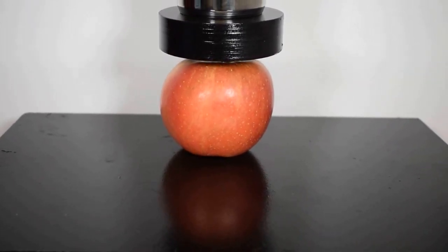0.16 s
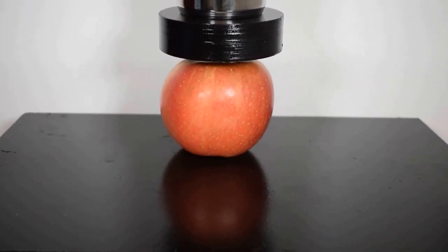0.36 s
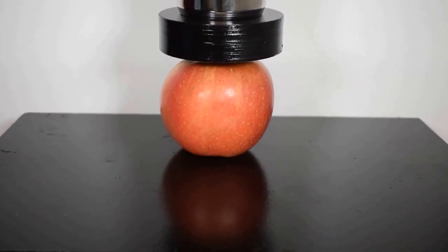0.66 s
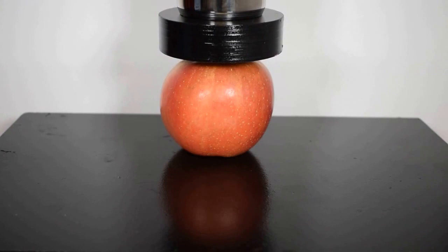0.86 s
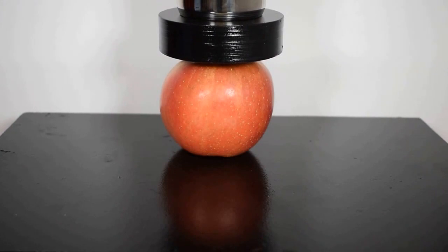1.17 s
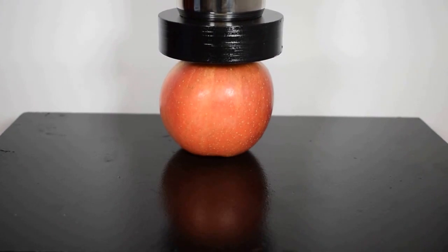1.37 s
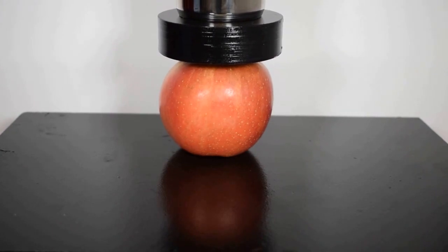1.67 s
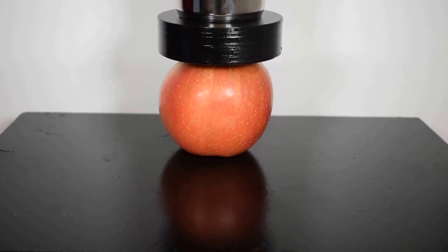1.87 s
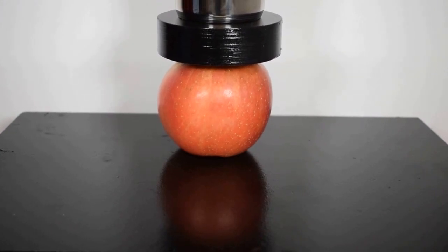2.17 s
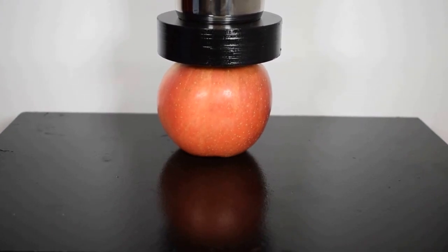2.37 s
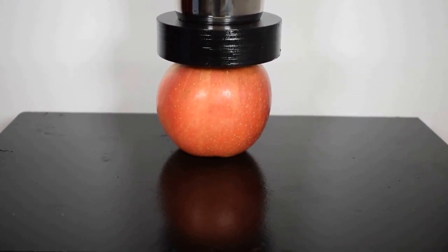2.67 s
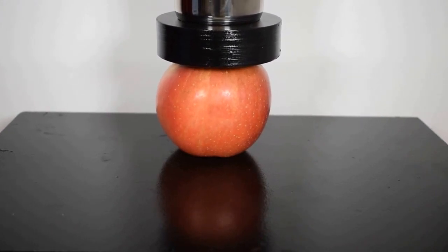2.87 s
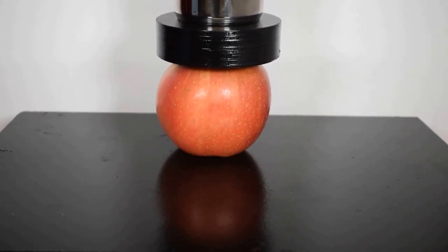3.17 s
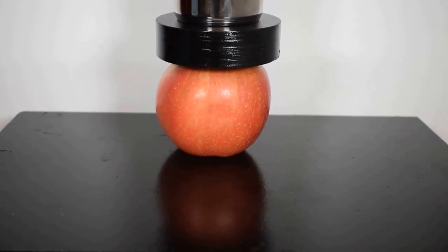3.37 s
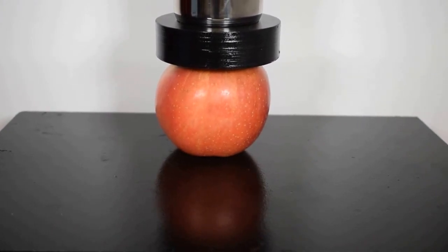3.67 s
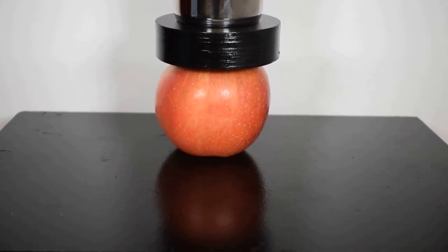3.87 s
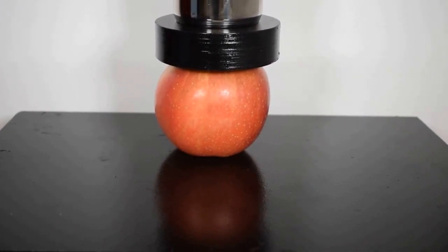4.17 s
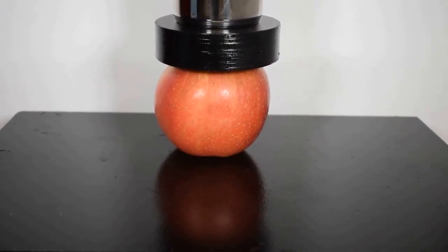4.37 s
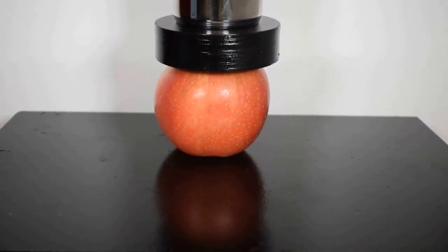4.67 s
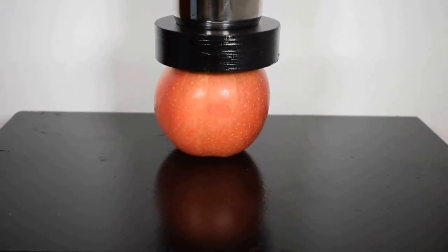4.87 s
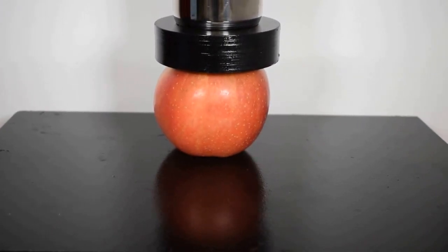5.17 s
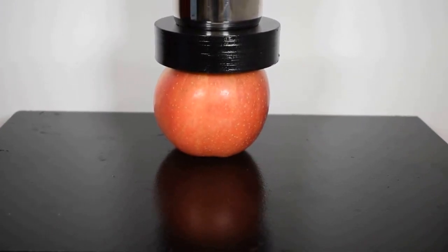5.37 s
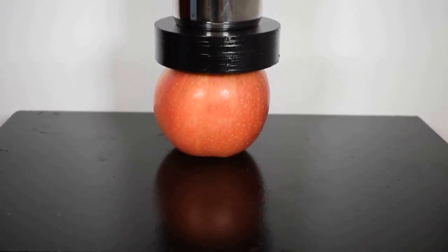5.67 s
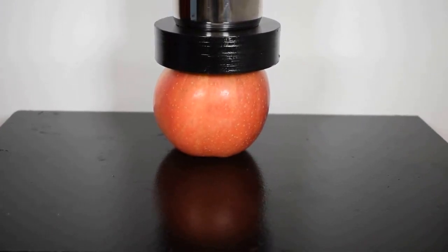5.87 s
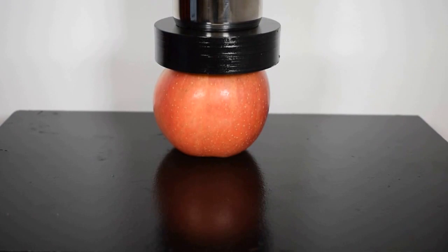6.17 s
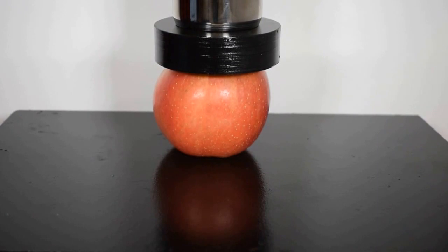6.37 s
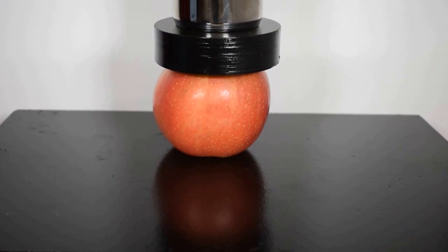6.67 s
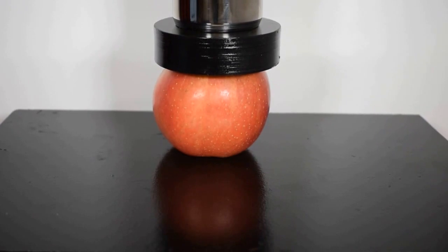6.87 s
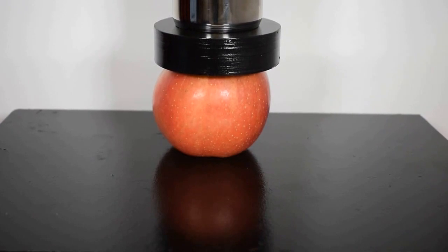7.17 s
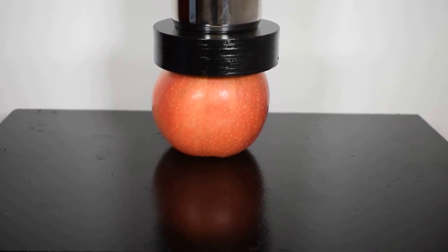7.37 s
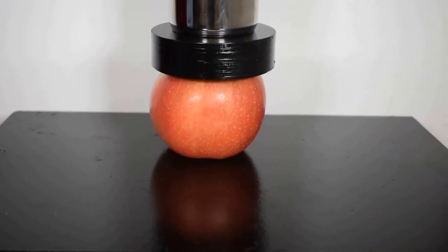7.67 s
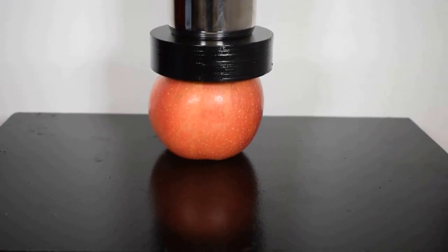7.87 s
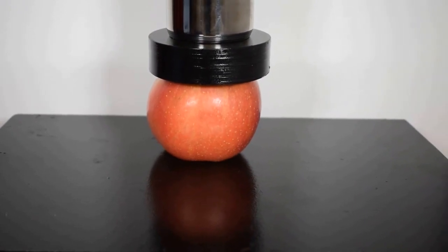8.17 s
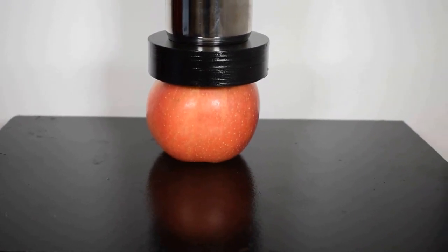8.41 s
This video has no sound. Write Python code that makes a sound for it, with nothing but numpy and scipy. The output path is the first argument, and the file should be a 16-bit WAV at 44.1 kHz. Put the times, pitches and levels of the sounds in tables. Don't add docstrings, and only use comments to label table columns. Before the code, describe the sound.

A loud motor-driven piston pump hammers steadily, about fourteen rapid metallic knocks a second, with buzzing hum, nasal reedy whine near two kilohertz and airy hiss.

```python
import sys
import numpy as np
from scipy import signal
from scipy.fft import rfft, irfft
from scipy.io import wavfile
from scipy.ndimage import uniform_filter1d, minimum_filter1d

SR = 44100
rng = np.random.default_rng(int(sys.argv[2]) if len(sys.argv) > 2 else 0)


def voltage_ratio(decibels):
    exponent = np.asarray(decibels, float) / 20
    return 10 ** exponent


def inscribe(sig):
    pcm = np.round(np.clip(np.atleast_2d(sig).T, -1, 1) * 32767)
    wavfile.write(sys.argv[1], SR, pcm.astype(np.int16))


N = 376613
TURN_HZ = 13.757

FRAME_HZ = [590, 690, 717, 797, 880, 950, 1030, 1462, 1510, 1700, 1724, 1780, 1900, 1972, 2020, 2045, 2092,
            2130, 2206, 2297, 2419, 2513, 2660, 2720, 2870, 3078, 3370]
# (width [Hz], rattle level [dB], ring level [dB], arrival of the main blow [0-1 of a turn])
FRAME_MODES = [(25, -22, -41.5, .26), (16, -22.5, -42.5, .3), (13.9, -12.5, -43, .33),
               (20.4, -22, -45.5, 0.2), (14.2, -11, -37, 0.26), (20, -24, -47.5, 0.54),
               (57.7, -12, -39, 0.6), (15.2, -2.5, -28, .24), (30, -12.5, -45, 0.4), (20, -9.5, -59, .3),
               (21.7, 1, -28, .3), (18, -1, -38.5, 0.28), (16.3, -4.5, -26.5, .22), (16, -9, -30, 0.09),
               (25, 2, -29, 0.46), (25, -6.5, -23, 0.37), (34, -5, -52, 0.23), (29.8, -3, -31, 0.9),
               (16.3, -14, -32, .38), (20, -8, -31, .3), (25.4, -3, -30.5, .53), (42.3, 2, -33, .26),
               (51.3, -1.5, -34.5, .22), (49.5, -0.5, -31, .3), (22, -2.5, -43, 0.37),
               (49.7, -5.5, -43, 0.25), (200, -24, -42, 0.3)]


def level(x, db):
    return x * voltage_ratio(db) / np.sqrt(np.mean(x ** 2))


def response(points, size=2048):
    hz, db = np.transpose(points)
    grid_hz = np.maximum(np.arange(size // 2 + 1) * SR / size, 1)
    colour_db = np.interp(np.log(grid_hz), np.log(hz), db)
    cepstrum = irfft(np.log(voltage_ratio(colour_db)))
    cepstrum[1:size // 2] *= 2
    cepstrum[size // 2 + 1:] = 0
    return irfft(np.exp(rfft(cepstrum)))


def ring(hz, width_hz, size=8192):
    s = np.arange(size) / SR
    decay = np.exp(-np.pi * width_hz * s)
    return 2 * np.pi * width_hz / SR * decay * np.sin(2 * np.pi * hz * s)


def through(x, h):
    return signal.oaconvolve(x, h)[:N]


def walk(rate_hz):
    hold = int(SR / rate_hz)
    steps = np.repeat(rng.standard_normal(N // hold + 1), hold)
    drift = uniform_filter1d(uniform_filter1d(steps, hold), hold)[:N]
    return drift / drift.std()


def clicks(at_s, size):
    inside = (at_s > 0) & (at_s < (N - 2) / SR)
    at, size = SR * at_s[inside], size[inside]
    whole = at.astype(int)
    part = at - whole
    return np.bincount(whole, size * (1 - part), N) + np.bincount(whole + 1, size * part, N)


def echoes(t60_s, size=16384):
    s = np.arange(size) / SR
    build_up = np.minimum(s / .006, 1) ** 2
    tail = rng.standard_normal(size) * voltage_ratio(-60 * s / t60_s) * build_up
    return tail / np.linalg.norm(tail)


def crank(scatter_ms):
    # (time [s], lag [ms])
    lag = [
        (0.0, 3.5),
        (2.0, 0.65),
        (5.4, -0.5),
        (6.4, 0.56),
        (8.54, 6),
    ]
    turn = np.arange(-2, N / SR * TURN_HZ + 2)
    even_s = turn / TURN_HZ
    lag_ms = np.interp(even_s, *np.transpose(lag)) + scatter_ms * rng.standard_normal(len(turn))
    start = even_s + lag_ms / 1000
    return start, np.interp(np.arange(N) / SR, start, turn)


def pressure():
    # (time [s], share [0-1])
    load = [
        (0, 0.2),
        (2, 0.14),
        (5, 0.33),
        (5.7, 0.72),
        (7.3, 0.8),
        (7.7, 0.8),
        (8.54, 0.78),
    ]
    return np.interp(np.arange(N) / SR, *np.transpose(load))


def bursts(turns, rows, rest_db):
    db = np.full(N, float(rest_db))
    for begin, end, top_db, swell_db, fade_db in rows:
        before_db = swell_db * ((begin - turns) % 1)
        after_db = fade_db * ((turns - end) % 1)
        held = (turns - begin) % 1 < end - begin
        db = np.maximum(db, top_db - np.where(held, 0, np.minimum(before_db, after_db)))
    return db


def knocks(start, scatter_db):
    # (angle [0-1 of a turn], level [dB], timing scatter [ms])
    valves = [(.02, 2.5, 0.435), (.22, -10, 0.16), (0.287, -4, 0.028), (0.318, -5.5, 0.011),
              (0.351, -7, 0.031), (.4, 5.5, 0.014), (0.467, 5.5, 0.027), (0.519, -7, 0.034),
              (0.556, -22, 0.036), (0.61, -14, 0.047), (.665, -9, 0.061), (0.782, 2, 0.058),
              (.83, -27, 0.044), (.94, 9, 0.1)]
    angle, db, scatter_ms = np.transpose(valves)[:, :, None]
    chance = rng.standard_normal((len(valves), 2, len(start)))
    at_s = start + angle / TURN_HZ + scatter_ms * chance[:, 0] / 1000
    return clicks(at_s, voltage_ratio(db + scatter_db * chance[:, 1]))


def blow(start, rise_ms, size=12000):
    ringing = np.zeros(size)
    swell = 1 - np.exp(-np.arange(8192) / SR / rise_ms * 1000)
    for hz, (width_hz, _, db, angle) in zip(FRAME_HZ, FRAME_MODES):
        tone = ring(hz, width_hz) * swell
        tone *= np.sqrt(SR / TURN_HZ) / np.linalg.norm(tone)
        late = int(angle / TURN_HZ * SR)
        ringing[late:late + len(tone)] += voltage_ratio(db) * tone
    strength = voltage_ratio(0.69 * rng.standard_normal(len(start)))
    return through(clicks(start, strength), ringing)


def frame(start, turns):
    # (from angle [0-1 of a turn], to angle [0-1 of a turn], held level [dB],
    # swell before [dB per turn], fade after [dB per turn])
    clatter_bursts = [
        (0.321, 0.318, 2.5, 75, 38),
        (0.627, 0.663, -9, 62, 160),
        (0.936, 0.954, -4.5, 65, 350),
    ]
    rattle_bursts = [
        (0.99, 1.122, -4, 52, 33),
        (0.32, 0.31, -6, 100, 73),
        (0.47, 0.76, -7, 110, 58),
    ]
    # (frequency [Hz], level [dB])
    housing_colour = [(60, -73), (110, -43), (200, -21), (330, -11.5), (480, -13.5), (620, -17.5),
                      (1200, -18), (1500, -14), (2100, -12.5), (2700, -13.5), (3150, -21.5), (3300, -25),
                      (6000, -33.5), (16000, -59)]
    reed_band_hz = [2040, 2160]

    steps = int(SR / TURN_HZ)
    clatter = np.interp(turns % 1 * steps, np.arange(steps), rng.standard_normal(steps))
    clatter = clatter * voltage_ratio(bursts(turns, clatter_bursts, -29))
    repeating = level(knocks(start, scatter_db=0.0), -7.5) + level(clatter, -1.7)
    repeating = signal.sosfilt(signal.butter(4, 560, "high", fs=SR, output="sos"), repeating)
    notch = signal.butter(1, reed_band_hz, "stop", fs=SR, output="sos")
    repeating = signal.sosfiltfilt(notch, repeating)

    rattle_db = bursts(turns, rattle_bursts, -24) + .5 * walk(30)
    rattle = level(voltage_ratio(rattle_db) * rng.standard_normal(N), -5.5)
    modes = np.zeros(8192)
    for k, (hz, (width_hz, db, _, _)) in enumerate(zip(FRAME_HZ, FRAME_MODES)):
        modes += (-1) ** k * voltage_ratio(db) * ring(hz, width_hz)
    housing = through(level(repeating, -4.0) + rattle, response(housing_colour))
    return level(housing, -19.0) + level(through(rattle, modes), -21.0) + blow(start, rise_ms=3.3)


def hum(turns):
    # (multiple of the turn rate, level [dB])
    bed = [(1, -43), (4, -59), (5, -34), (7, -43), (8, -17.5), (32, -7), (40, -12)]
    # (multiple of the turn rate, level [dB])
    single_orders = [(6, -25), (10, -6.5), (11, -8.5), (13, -14), (14, -16.5), (15, -11), (17, -4.5),
                     (19, -2.5), (20, -12.5), (21, -10.5), (23, -8), (24, -2), (25, 0.5), (26, -8.5),
                     (28, -14), (29, -5), (31, -6), (33, 3.5), (34, 1), (35, -8.5), (36, -2.5), (37, 3),
                     (38, -8), (39, -8.5)]
    meeting = [(5, .22, .01), (8.05, .3, 0.053), (10.94, 0, .05), (12.96, .35, .2), (25.1, .5, 0.282),
               (32.05, .28, 0.053), (39.5, 0.68, 0.04)]
    order = np.arange(40) + 1
    db = np.interp(order, *np.transpose(bed))
    single, single_db = np.transpose(single_orders)
    db[np.round(single).astype(int) - 1] = single_db
    multiple, angle, spread = np.transpose(meeting)
    peak = np.interp(order, multiple, angle)
    peak = peak + np.interp(order, multiple, spread) * rng.standard_normal(len(order))
    lag = np.cumsum(peak)

    grid = np.arange(4096) / 4096
    shapes = voltage_ratio(db)[:, None] * np.cos(2 * np.pi * (order[:, None] * grid - lag[:, None]))
    of_table = (order >= 33) & (order <= 36)
    steady = np.interp(turns % 1, grid, shapes[~of_table].sum(axis=0), period=1)
    table = np.interp(turns % 1, grid, shapes[of_table].sum(axis=0), period=1)
    table = voltage_ratio(2.9 * pressure() + 0.68 * walk(3.02)) * table
    high = voltage_ratio(-29.5 + .8 * walk(13)) * pressure() ** 3 * np.cos(2 * np.pi * 73 * turns)
    return level(steady + table, -28.5) + high


def reed(start, turns):
    # (from angle [0-1 of a turn], to angle [0-1 of a turn], held level [dB],
    # swell before [dB per turn], fade after [dB per turn])
    song_bursts = [
        (.27, .4, 1, 300, 10),
        (.5, .64, 0, 10, 110),
    ]
    reed_hz, rise_hz = 2081, 22
    since_s = (turns - .1) % 1 / TURN_HZ
    sway = .15 * walk(40)
    whine_db = bursts(turns, song_bursts, -30) + .5 * walk(9.0)
    song = voltage_ratio(whine_db) * np.sin(2 * np.pi * (reed_hz + rise_hz * pressure()) * since_s + sway)

    chance = rng.standard_normal((2, len(start)))
    slap = clicks(start + (.9 + .035 * chance[0]) / TURN_HZ, voltage_ratio(2.9 * chance[1]))
    tongue = ring(reed_hz + rise_hz / 2, 60)
    slap = through(through(slap, tongue), tongue)
    return level(song, -17.7) + level(slap, -26.5)


def air(turns):
    # (from angle [0-1 of a turn], to angle [0-1 of a turn], held level [dB],
    # swell before [dB per turn], fade after [dB per turn])
    hiss_bursts = [
        (0.273, .285, 2, 12, 5.6),
    ]
    jet_bursts = [
        (0.03, .24, 5, 220, 45),
    ]
    oil_bursts = [
        (0.585, 0.574, 6.5, 130, 90),
        (.01, .02, 3, 80, 90),
    ]
    # (frequency [Hz], level [dB])
    hiss_colour = [(1500, -30), (3000, -1), (4500, 0), (6200, -3), (8500, -5), (10700, -3.5), (12500, -6.5),
                   (14500, -15.5), (16500, -22)]
    hiss_db = bursts(turns, hiss_bursts, -4) + 0.49 * walk(25)
    hiss = through(voltage_ratio(hiss_db) * rng.standard_normal(N), response(hiss_colour))

    jet_db = bursts(turns, jet_bursts, -24) + 0.22 * walk(90)
    throat = ring(7200, width_hz=860)
    jet = through(through(voltage_ratio(jet_db) * rng.standard_normal(N), throat), throat)

    oil_db = bursts(turns, oil_bursts, -2.5)
    bore = through(voltage_ratio(oil_db) * rng.standard_normal(N), ring(4525, width_hz=90))
    direct = level(hiss, -22.5) + level(jet, -32) + level(bore, -33)
    return direct + voltage_ratio(-11.5) * through(direct, echoes(t60_s=0.11))


def scene():
    plate_hz = [1660, 1820]
    # (frequency [Hz], level [dB])
    port_difference = [(60, -48), (380, -27.5), (1290, -28), (1720, -19), (2090, -15.5), (2500, -12.5),
                       (4400, -17), (4900, -9), (6300, -11), (8400, 1), (10800, -6.5), (15000, -0.5)]
    # (centre [Hz], width [Hz], level [dB], port [+1 left, -1 right])
    shade = [(7300, 1100, -10, 1), (10200, 3600, -14, -1), (14400, 3000, -5, 1)]
    start, turns = crank(scatter_ms=0.055)
    steel = frame(start, turns)
    plate = signal.sosfiltfilt(signal.butter(2, plate_hz, "band", fs=SR, output="sos"), steel)
    body = steel - 0.26 * pressure() * plate + hum(turns)
    mid = body + reed(start, turns) + air(turns)

    reflections = through(body, echoes(t60_s=.04))
    side = through(reflections + air(turns), response(port_difference))
    for hz, width_hz, db, port in shade:
        edges_hz = [hz - width_hz / 2, hz + width_hz / 2]
        band = signal.butter(1, edges_hz, "band", fs=SR, output="sos")
        side = side + port * voltage_ratio(db) * signal.sosfiltfilt(band, mid)
    return np.array([mid + side, mid - side])


def roll_off(x):
    return signal.sosfilt(signal.butter(12, 15800, fs=SR, output="sos"), x)


def record(dry):
    span = int(.004 * SR)
    peak = np.maximum(np.abs(dry).max(axis=0), 1e-9)
    wanted = np.minimum(0.91 / peak, 1) ** 0.2
    gain = uniform_filter1d(minimum_filter1d(wanted, span), span)
    bass_cut = signal.butter(2, 70, "high", fs=SR, output="sos")
    top_cut = signal.ellip(10, .2, 60, 15730, fs=SR, output="sos")
    mix = signal.sosfilt(top_cut, signal.sosfilt(bass_cut, dry * gain))
    return roll_off(np.clip(mix, -1, 1))


dry = scene()
out = record(dry)
inscribe(out)
```